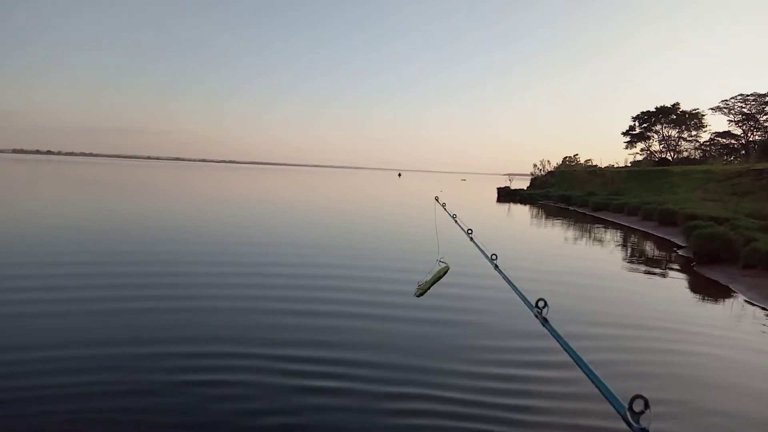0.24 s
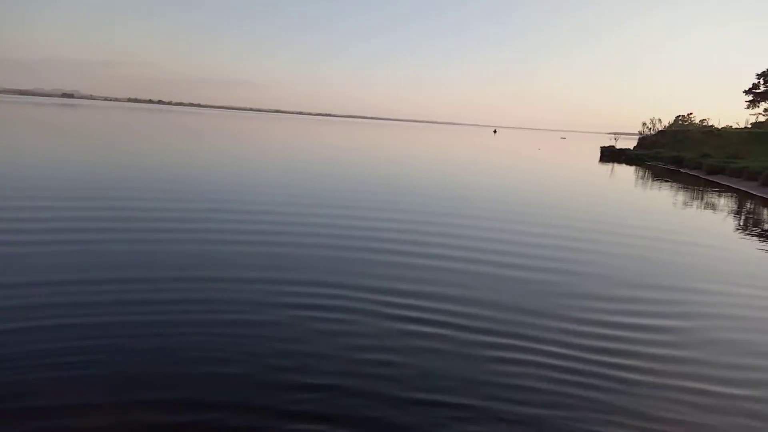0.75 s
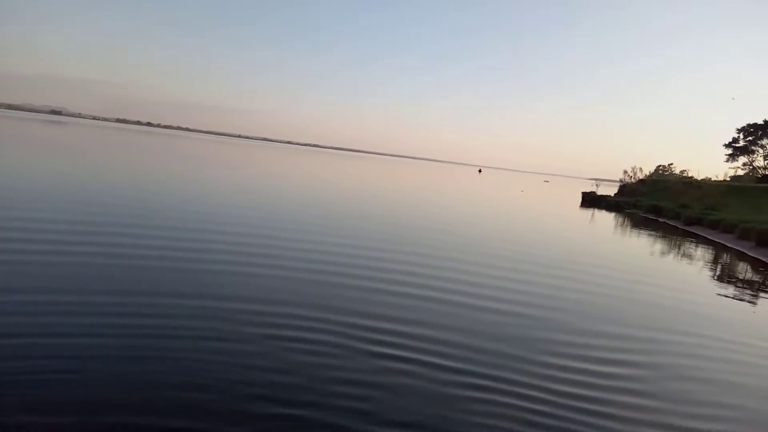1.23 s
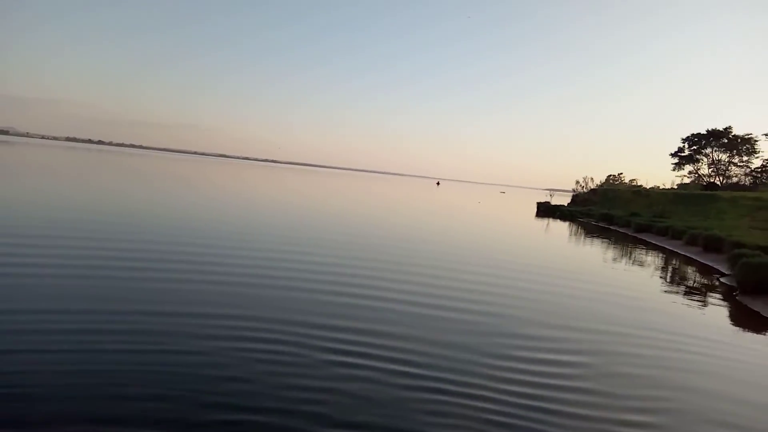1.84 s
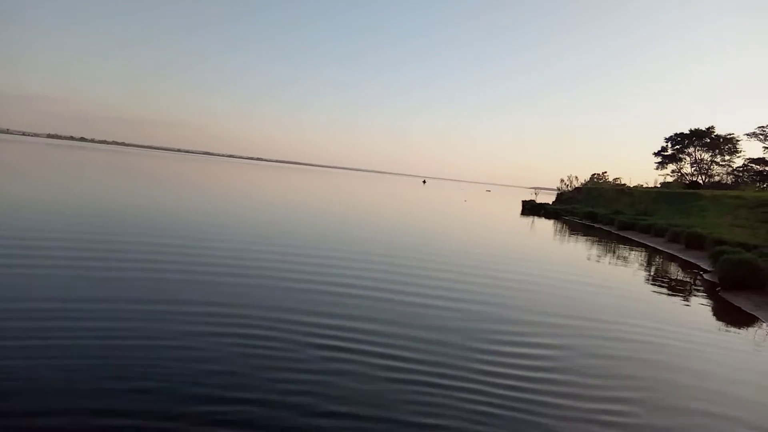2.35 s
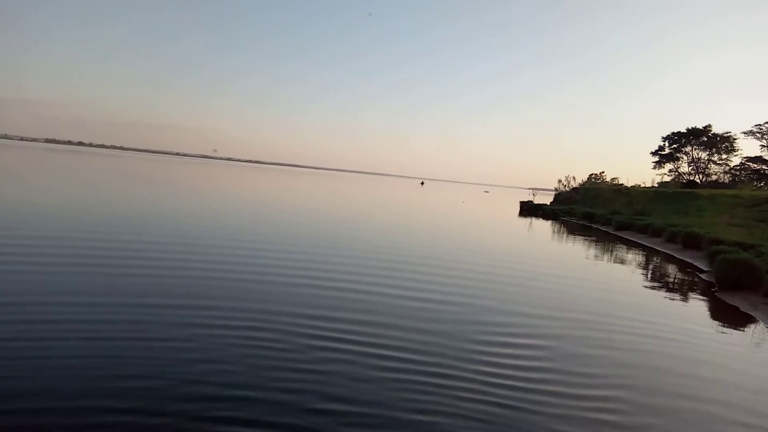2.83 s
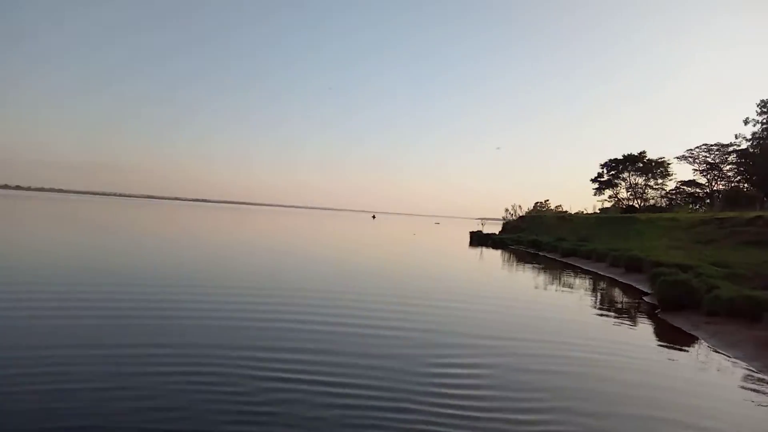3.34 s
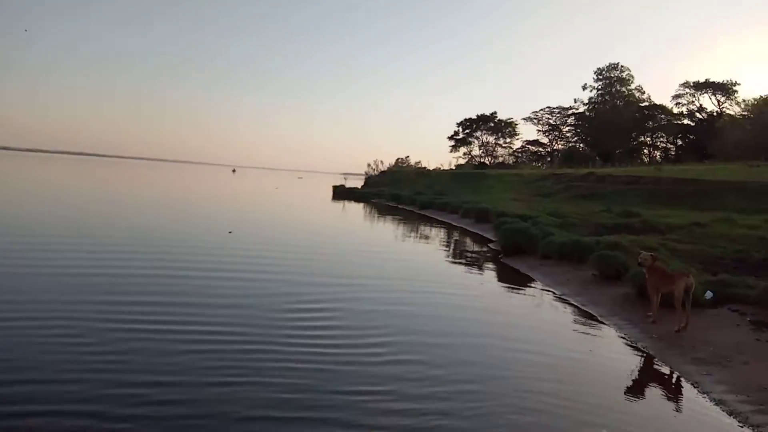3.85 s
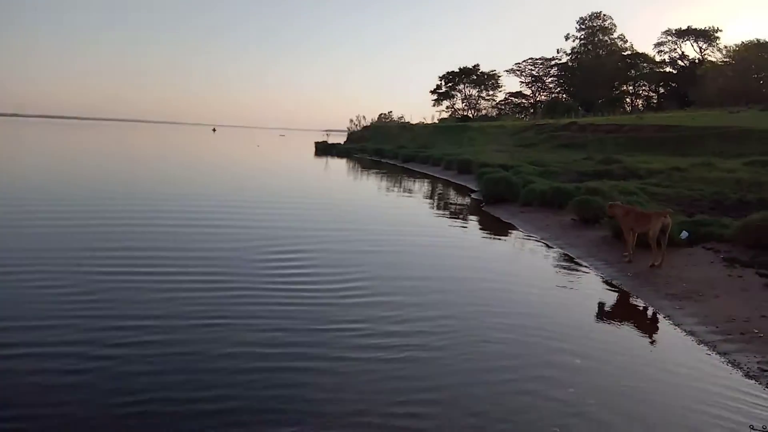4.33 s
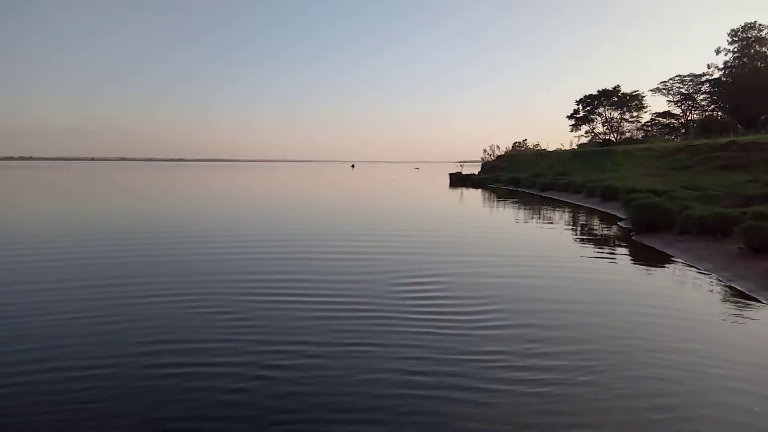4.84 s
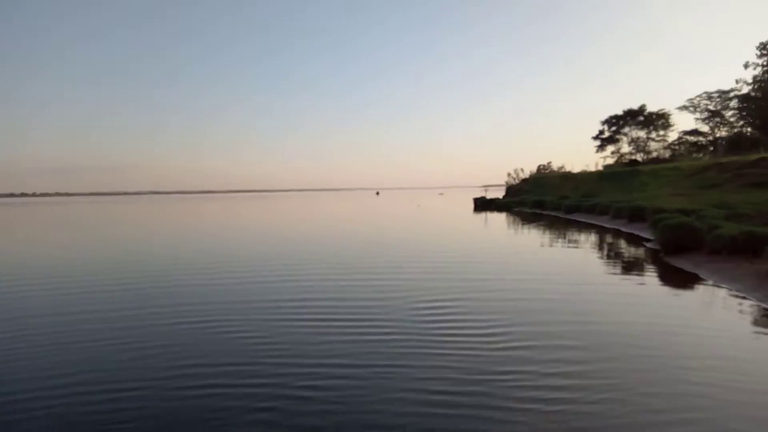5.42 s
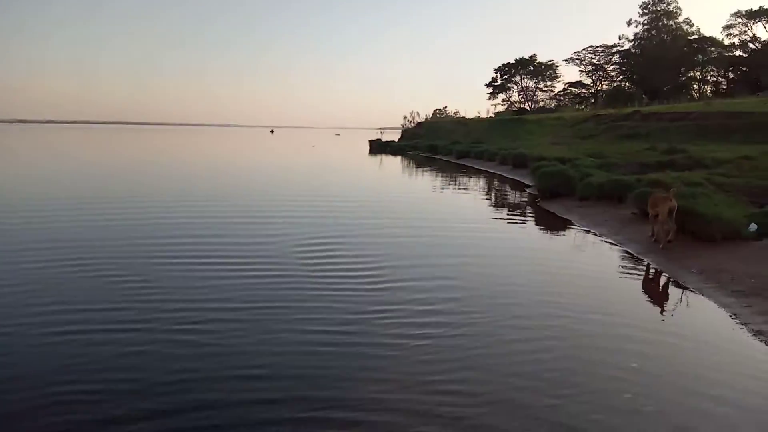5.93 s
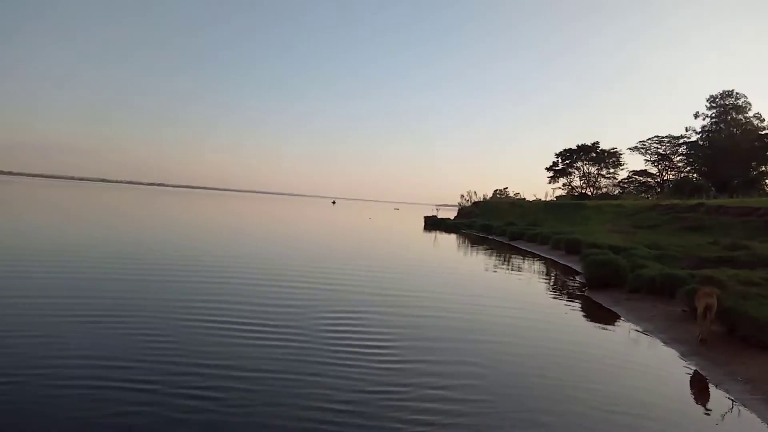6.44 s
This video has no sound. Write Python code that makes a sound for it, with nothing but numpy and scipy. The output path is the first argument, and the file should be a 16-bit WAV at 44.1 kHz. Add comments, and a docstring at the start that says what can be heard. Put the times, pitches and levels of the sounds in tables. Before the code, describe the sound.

A calm open lakeside at dusk, heard from a handheld microphone right beside fishing tackle. Thin, high crickets pulse steadily throughout over a soft low shore murmur and faint hiss. From 0 to 0.5 s, dull low bumps knock the microphone housing. A bright rattle and sharp knock at 0.7 s come with small bubbly water blips until about 1.1 s. From 1.3 to 3.9 s the reel ticks unevenly amid dry clatter and knocks; hard catch snaps sound at 1.6 and 2.6 s, with dense clacks and heavy thumps near 2.4-2.5 s and bright rattling around 3.2 s. After 3.9 s it is much quieter: a hollow sinking plop at 4.2 s, slight tackle rustles and a faint, slowly rising engine hum. From 5.85 s small splashes and gurgling bubbles return with light rattles, and lapping grows to the end at 6.7 s.

```python
"""Fishing tackle rattles and knocks close by on a calm lake shore at dusk, as the angler casts and winds the reel.
It is noise pushed through resonances; the reel's catch snaps over, and dull bumps ring the microphone's housing.
Gliding, decaying tones make the bubbles of small splashes; crickets in the grass are short sinking tones in strokes.
A far engine hums as one low tone, faint chirps come from along the bank, and shaped noise makes the shore murmur."""
import sys
import numpy as np
from scipy import signal
from scipy.io import wavfile
from scipy.ndimage import uniform_filter1d

SR = 44100
rng = np.random.default_rng(int(sys.argv[2]) if len(sys.argv) > 2 else 0)


def dump_mix(stems):
    """Bounce the given channels to the path in sys.argv[1] as a 16-bit WAV at rate SR."""
    frames = np.atleast_2d(stems).T  # one column per channel
    limited = np.clip(frames, -1, 1)  # hard clip at full scale
    pcm = np.round(limited * 32767).astype(np.int16)
    wavfile.write(sys.argv[1], SR, pcm)


N = 294147

# slow course of the evening:
# (time [s], low crickets [dB], high crickets [dB], shore murmur and lapping [dB])
EVENING_COURSE = [(0.0, -60.5, -62, -69), (5.89, -60, -62, -61), (6.67, -64.5, -60.5, -53.5)]
# the reel's catch snaps over: (time [s], relative level [dB])
CATCH_SNAPS = [(1.603, -29), (1.6074, -18.5), (1.62, -24.5), (2.611, -19)]


def undb(db):
    """Logarithmic level: 20 dB is a factor of ten in amplitude."""
    return np.exp(np.asarray(db) * (np.log(10) / 20))


def level(x, db=0):
    """Root mean square: scale a signal to a given effective level."""
    return x * undb(db) / np.sqrt(np.mean(x ** 2))


def curves(table):
    """Linear interpolation: the columns of a table over every sample."""
    s, *columns = np.transpose(table)
    return [np.interp(np.arange(N) / SR, s, c) for c in columns]


def gate(table, fade=0.081):
    """Windowing: 1 from the first to the last time of a table, with linear fades [s] to 0 outside."""
    s = np.arange(N) / SR
    return np.clip(np.minimum(s - table[0][0], table[-1][0] - s) / fade + 1, 0, 1)


def ring(x, modes):
    """Modal superposition: parallel resonances, scaled so that white noise keeps its level."""
    filters = [(undb(db), *signal.iirpeak(hz, hz / width, SR), width) for hz, width, db in modes]
    power = sum(g ** 2 * width for g, b, a, width in filters) * np.pi / SR
    return sum(g * signal.lfilter(b, a, x) for g, b, a, width in filters) / np.sqrt(power)


def walk(rate):
    """Band-limited fluctuation: random values held 1 / rate s and smoothed twice, spread near 1."""
    k = int(SR / rate)
    held = np.repeat(rng.standard_normal(N // k + 1), k)
    return 1.3 * uniform_filter1d(uniform_filter1d(held, k), k)[:N]


def add(out, s, piece):
    """Linear superposition: mix a piece in at a time [s]."""
    i = int(s * SR)
    out[..., i:i + piece.shape[-1]] += piece[..., :N - i]


def decay(t, t60):
    """Exponential damping: amplitude falls by 60 dB in t60 seconds."""
    return np.exp(-np.log(1000) * t / t60)


def bursts(rows, rise_db_per_s, fall_db_per_s):
    """Exponential envelopes: each burst swells up to its start, holds for its length and dies away; powers add."""
    t = np.arange(0, N / SR, .001)[:, None]  # a coarse grid, 1 ms apart
    s, length, db = np.transpose(rows)
    before = np.maximum(s - t, 0)
    after = np.maximum(t - s - length, 0)
    db = db - rise_db_per_s * before - fall_db_per_s * after
    return np.interp(np.arange(N) / SR, t[:, 0], np.sqrt(np.sum(undb(db) ** 2, axis=1)))


def gliding_tone(db, hz, t60, rise, attack_s=0.00077):
    """Damped oscillation: a sine that glides by `rise` octaves while it fades, as a pocket of air rings."""
    t = np.arange(int(t60 * SR)) / SR
    phase = 2 * np.pi * np.cumsum(hz * 2 ** (rise * t / t60)) / SR
    attack = np.minimum(t / max(attack_s, 0.91 / hz), 1)
    return undb(db) * attack * decay(t, t60) * np.sin(phase)


def swarm(count, low_hz, octaves, cycles, scatter_db, small_db, rise):
    """Random superposition: gliding tones of random pitch at random moments, rms 1."""
    out = np.zeros(N)
    for when, small, loud, glide in rng.random((count, 4)):
        hz = low_hz * 2 ** (octaves * small)
        db = small_db * small - scatter_db * np.log(1 - loud)
        add(out, when * N / SR, gliding_tone(db, hz, cycles / hz, rise * (glide - .25)))
    return level(out)


def echo(x, t60, wet_db):
    """Diffuse reflection: scattered echoes off grass and bank as a decaying noise tail."""
    t = np.arange(SR // 4) / SR
    tail = rng.standard_normal(SR // 4) * decay(t, t60)
    return x + undb(wet_db) * signal.fftconvolve(x, tail / np.sqrt(np.sum(tail ** 2)))[:N]


def tackle(per_s=340, pawl_per_s=60, pawl_db=(-4, -2, 8, 4, 7), scatter_db=3.5, colour_db=5, bed_db=-9,
           stir_db=-91, airy_db=-9, crest_db=-9, knock_t60=0.016, grain_s=.0007):
    """Modal excitation: uneven chatter, the reel's ticking pawl and single knocks ring the same modes."""
    # what the tackle rings with, in a dull, a hard, a bright, an airy and a thin group:
    # (frequency [Hz], width [Hz], level [dB])
    tackle_modes = ([(2656, 290, 8.5), (3450, 3560, 6.5)], [(6610, 230, 8.5), (7330, 200, 3.5)],
                    [(8400, 970, 0)], [(10230, 1900, 0)], [(15050, 2800, 15.5)])
    # the tackle is moved about: (start [s], length [s], relative bright level [dB])
    rattle_bursts = [(.43, 0.25, -68), (.55, 0.19, -52.5), (.93, 0.053, -68), (1.06, 0.072, -51.5),
                     (1.43, 0.064, -52), (1.72, 0.056, -53.5), (1.93, 0.034, -54.5), (2.16, 0.069, -61),
                     (2.46, 0.069, -42.5), (2.68, 0.12, -48), (2.97, 0.025, -51.5), (3.14, 0.02, -44),
                     (3.24, 0.22, -47.5), (3.54, 0.0041, -42), (3.64, 0.12, -52), (3.8, 0.052, -64.5),
                     (4.62, 0.0055, -76.5), (4.71, 0.033, -74.5), (4.91, 0.013, -81), (5.06, 0.015, -68.5),
                     (5.85, 0.024, -61), (6.08, 0.08, -58), (6.4, 0.18, -75.5), (6.62, 0.028, -69)]
    # single knocks: (time [s], relative bright level [dB], dull over bright [dB], thin over bright [dB])
    knock_hits = [(0.7056, -16, -10, 6), (0.712, -23.5, 5.5, -4), (0.7327, -33, 15, -8),
                  (0.769, -40, 20, -6), (1.0638, -41, 16.5, -5), (1.291, -27, 6, 0), (1.315, -23.5, -21, 3),
                  (1.352, -28.5, 7, 4), (1.4182, -32.5, 5, -16), (1.573, -29.5, -6, -7),
                  (1.673, -23, -14, -3), (1.698, -25, -25, 5), (1.854, -34.5, -38, 17),
                  (1.888, -31, -6, 10), (1.901, -29.5, -5, 7), (1.975, -28.5, -43, 1),
                  (2.0352, -28, -44, 11), (2.38, -20.5, -0.5, 13), (2.473, -17.5, -11, 11),
                  (2.489, -15.5, -13, 0), (2.647, -25.5, -8.5, -9), (2.773, -22.5, -9, -16),
                  (2.9086, -33, -41, 17), (2.9395, -21, -48, 9), (2.986, -24.5, -50, 9),
                  (3.11, -25, -5.5, -9), (3.2249, -19.5, -43, 16.5), (3.254, -19, -18, 4),
                  (3.31, -25, -19, 15), (3.3785, -16, -14, -8), (3.5191, -34.5, 8.5, 25),
                  (5.0885, -38.5, -17, 5), (6.2519, -40, 14, -7)]
    # where the tackle hangs: (time [s], dull over bright [dB], airy over bright [dB], thin over bright [dB])
    tone_course = [(.4, 2, -15, 4.5), (1.7, -3.5, -29, 2), (1.95, -12, -11, 4), (3.0, -12, -20, 4.5),
                   (3.9, 1, -8, 2), (5.1, -2, 1, -2), (6.67, -4.5, -12, 1)]
    # the reel turns from the first to the last: (time [s],)
    winding_span = [(1.27,), (3.9,)]

    chance = rng.random((2, N))
    struck = chance[0] < per_s / SR * undb(4 * walk(25))
    hits = struck * undb(-scatter_db * np.log(1 - chance[1]))
    teeth = np.cumsum(pawl_per_s * (1 + 0.6 * walk(9.5))) / SR
    ticks = np.diff(np.floor(teeth), prepend=0)
    hits = hits + undb(pawl_db)[:, None] * gate(winding_span) * ticks
    hits = hits * undb(colour_db * rng.standard_normal((len(tackle_modes), N)))  # every scrape favours other modes
    smeared = signal.lfilter([1], [1, -np.exp(-1 / (grain_s * SR))], hits)
    grains = level(smeared) + undb(bed_db)

    # loose parts chatter on for a moment after each knock and snap
    after = [(s, 0.017, db - 28.5) for s, db, *_ in knock_hits + CATCH_SNAPS]
    strength = np.hypot(bursts(rattle_bursts, 458, 302), bursts(after, 1900, 388))
    strength = strength + undb(stir_db + 4.05 * walk(7.3))  # never quite still
    dull_db, airy_tone_db, thin_db = curves(tone_course)
    same_db = 0 * dull_db
    push = strength * grains * undb([dull_db, same_db, same_db, airy_tone_db, thin_db])

    t = np.arange(SR // 10) / SR
    for (s, db, dull_db, thin_db), long in zip(knock_hits, rng.standard_normal(len(knock_hits))):
        fall = np.minimum(t / 0.0013, 1) * decay(t, knock_t60 * 1.55 ** long)
        group_db = np.array([[dull_db], [0], [0], [airy_db], [thin_db]])
        add(push, s, undb(crest_db + db + group_db) * fall)

    scrape = rng.standard_normal(N)
    dull, hard, bright, airy, thin = (ring(p * scrape, modes) for p, modes in zip(push, tackle_modes))
    thin = undb(-9.0) * ring(thin, tackle_modes[-1])  # the topmost resonance has steep flanks
    mix = dull + (hard + bright) / np.sqrt(2) + airy + thin
    return signal.sosfilt(signal.butter(3, 1000, "high", fs=SR, output="sos"), mix)


def snaps(t60=.017):
    """Impact excitation: hard plastic on metal, a sharp noisy push that rings the catch."""
    # (frequency [Hz], width [Hz], level [dB])
    catch_modes = [(4450, 1300, 7), (5400, 2600, 4), (6250, 180, 12), (623, 160, -1.5)]
    push, t = np.zeros(N), np.arange(SR // 10) / SR
    for s, db in CATCH_SNAPS:
        add(push, s, undb(db) * decay(t, t60))
    return undb(-2.5) * ring(push * rng.standard_normal(N), catch_modes)


def bumps(per_s=70, start_push=0.26):
    """Structure-borne sound: irregular random pushes, and a small fixed one at each start, ring the housing."""
    # jolts of the housing: (start [s], length [s], level [dB])
    jolt_bursts = [(0.038, 0.023, -48), (0.159, 0.032, -55), (0.28, 0.0086, -51), (0.359, 0.011, -52),
                   (0.496, 0.013, -55), (1.124, 0.039, -57.5), (1.204, 0.033, -58), (1.68, 0.017, -52.5),
                   (1.878, 0.1, -59), (2.363, 0.088, -49.5), (2.427, 0.11, -43), (2.64, 0.022, -48),
                   (2.961, 0.014, -48.5), (3.207, 0.031, -51), (3.284, 0.082, -48), (3.431, 0.21, -53),
                   (3.853, 0.026, -45.5), (4.472, 0.17, -65)]
    # (frequency [Hz], width [Hz], level [dB])
    housing_modes = [(99.7, 28, 1), (170, 190, -38.5)]
    # sharper blows on the housing: (time [s], peak level [dB], starting frequency [Hz], t60 [s])
    thump_tones = [(1.696, -23.5, 170, 0.034), (2.428, -38, 170, 0.085), (2.486, -32.5, 200, 0.112)]
    pushes = (rng.random(N) < per_s / SR) * rng.standard_normal(N)
    pushes[(np.transpose(jolt_bursts)[0] * SR).astype(int)] = start_push
    soft = signal.sosfilt(signal.butter(3, [45, 230], "band", fs=SR, output="sos"), pushes)
    thud = ring(soft, housing_modes)
    local_rms = np.sqrt(uniform_filter1d(thud ** 2, SR // 12))
    even = thud / (local_rms + 0.37 * thud.std())
    out = bursts(jolt_bursts, 801, 486) * level(even)
    for s, *shape in thump_tones:
        add(out, s, gliding_tone(*shape, rise=-1.0))
    return out


def splashes(lap_db=-6, lap_swell_db=2.2, rise=0.74, sink=-0.175, wash_db=-11, flutter_db=4.5):
    """Bubble resonance: single bubbles rise in pitch near the surface, over a wash, swarms and soft lapping."""
    # single bubbles: (time [s], relative peak level [dB], starting frequency [Hz], t60 [s])
    bubble_tones = [(0.706, -35, 866, 0.052), (0.771, -18, 1860, 0.0088), (0.793, -28, 780, 0.032),
                    (0.83, -44.5, 385, 0.16), (.865, -46.5, 683, 0.11), (.941, -45.5, 666, 0.17),
                    (1.023, -32.5, 2400, 0.019), (1.025, -48, 830, 0.036), (1.064, -39, 1230, 0.029),
                    (1.139, -42, 1010, 0.026), (4.094, -58, 3450, 0.059), (4.108, -44.5, 470, 0.072),
                    (4.381, -38, 1450, 0.015), (5.852, -27, 2380, 0.0086), (5.88, -35.5, 2670, 0.014),
                    (5.908, -45.5, 1190, 0.043), (6.014, -22, 1815, 0.032), (6.029, -43, 753, 0.11),
                    (6.044, -40, 1010, 0.038), (6.085, -34, 1050, 0.034), (6.103, -32.5, 382, 0.14),
                    (6.145, -34.5, 2730, 0.022), (6.250, -40, 940, 0.017), (6.269, -25, 2655, 0.0038),
                    (6.361, -43.5, 1800, 0.023), (6.584, -38, 1900, 0.023), (6.602, -32.5, 450, 0.033)]
    # one hollow plop whose tones sink: (time [s], relative peak level [dB], starting frequency [Hz], t60 [s])
    plop_tones = [(4.192, -33.5, 506, 0.061), (4.196, -35.5, 1545, 0.031), (4.196, -37.5, 444.5, 0.28)]
    # swirls of small bubbles: (start [s], length [s], relative level [dB])
    gurgle_bursts = [(.716, 0.075, -48.5), (1.03, 0.068, -54.5), (4.1, 0.24, -68.5), (5.94, 0.13, -48.5),
                     (6.07, 0.043, -46.5), (6.25, 0.01, -55), (6.34, 0.19, -65), (6.59, 0.093, -49.5)]
    lapping = swarm(count=900, low_hz=489.0, octaves=1.111, cycles=90, scatter_db=3.5, small_db=-3, rise=1.0)
    murmur_db = curves(EVENING_COURSE)[2]
    out = undb(murmur_db + lap_db + lap_swell_db * walk(2.674)) * lapping

    fizz = swarm(count=2800, low_hz=700.0, octaves=2.5, cycles=26, scatter_db=2.8, small_db=9, rise=0.98)
    wash = undb(wash_db) * ring(rng.standard_normal(N), [(1530, 2400, 0)])
    out += bursts(gurgle_bursts, 802, 148) * (fizz + wash)

    single = np.zeros(N)
    for s, *shape in bubble_tones:
        add(single, s, gliding_tone(*shape, rise))
    for s, *shape in plop_tones:
        add(single, s, gliding_tone(*shape, sink))
    out += single * undb(1 - flutter_db * np.abs(walk(110)))  # the churned surface makes them flutter
    return echo(out, 0.057, -6.5)


def crickets(unsteady_db=3.5, fading_db=2.0, slip=1.28, detune=.008, octave_db=-11):
    """Stridulation: each wing stroke is a short tone that sinks in pitch, none quite alike; the grass smears them."""
    # one row per choir: (wing tone [Hz], spread of pitch [Hz], strokes per second [1/s],
    # spread of stroke rate [0-1], stroke share of the period [0-1], level relative to the evening's [dB])
    cricket_kinds = [(4320, 10.2, 41, 0.01, 0.62, -7.5), (4740, 11, 12.8, 0.01, 0.4, -9.5),
                     (4510, 125, 48, 0.4, 0.9, -6.5), (5834, 270, 68, 0.4, .7, 3),
                     (6640, 130, 39, 0.08, 0.6, -8)]
    # for each choir in turn: (singers [count])
    singer_counts = (1, 1, 11, 16, 4)
    low_db, high_db, _ = curves(EVENING_COURSE)
    t, out, drift = np.arange(N) / SR, 0, walk(1.54)
    for (hz, spread_hz, rate, loose, share, db), count in zip(cricket_kinds, singer_counts):
        choir = 0
        alone = count == 1  # the two nearest are steadier and have an overtone
        rank = (np.arange(count) + rng.random(count)) / count
        pitches = np.log(rank / (1 - rank)) / 1.7  # they fill the range, densest in its middle
        for pitch, (pace, size) in zip(pitches, rng.standard_normal((count, 2))):
            own = np.roll(drift, rng.integers(N))
            beat = rate * (1 + loose * pace) * t + rng.random() * (not alone) + 0.08 * own + 1
            stroke = np.clip(beat % 1 / share, 0, 1)
            per_stroke = rng.standard_normal((3, 1000))[:, beat.astype(int)]
            force, tune, jump = per_stroke * (.4 if alone else 1)
            wing_hz = hz + spread_hz * np.clip(pitch, -2, 2)
            phase = 2 * np.pi * np.cumsum(wing_hz * (1.008 - .016 * stroke + detune * tune)) / SR
            tone = np.sin(((phase + slip * jump) % (2 * np.pi)).astype(np.float32))
            envelope = np.sin(np.pi * stroke.astype(np.float32))
            swing = undb(0.12 * size + unsteady_db * force + fading_db * own) * envelope
            overtone = alone * undb(octave_db + fading_db * own) * 2 * tone ** 2  # squaring gives the octave
            choir = choir + swing * (tone + overtone)
        out = out + level(choir, db) * undb(low_db if hz < 5000 else high_db)
    out = signal.sosfilt(signal.butter(2, 3000, "high", fs=SR, output="sos"), out)
    return echo(out, 0.35, -8.5)


def engine():
    """Periodic source: a distant engine reaches the shore as one wavering low tone."""
    # (time [s], frequency [Hz], level [dB])
    engine_course = [(3.95, 53.4, -78), (4.9, 58.2, -66), (5.4, 59.6, -68), (5.6, 63.1, -78),
                     (6.15, 66.4, -65.5), (6.67, 68.7, -73)]
    hz, db = curves(engine_course)
    tone = np.sqrt(2) * np.sin(2 * np.pi * np.cumsum(hz) / SR)
    return gate(engine_course, 0.16) * undb(db + 0.15 * walk(14)) * tone


def chirps(db=-91):
    """Reverberant field: faint drawn-out chirps from far along the bank, their echoes above the direct sound."""
    calls = swarm(count=110, low_hz=1900, octaves=.9, cycles=260, scatter_db=4.0, small_db=-8, rise=0.071)
    return undb(db) * echo(calls, .3, 3)


def air(murmur_level_db=-68, hiss_db=-91.5, gust_depth_db=3.5):
    """Band-filtered noise: a shore murmur of flickering bands, the middle swelling with the ripples, and faint hiss."""
    # spectrum of the murmur: (frequency [Hz], relative density [dB per Hz])
    air_spectrum = [(25, -36), (54, 2), (205, -7), (286, -17), (418, -14.5), (637, -6), (949, -28.5),
                    (1410, -21.5), (3800, -33.5), (4940, -89)]
    swell_db = curves(EVENING_COURSE)[2]
    swell_db = swell_db - swell_db.mean()
    gust_db = gust_depth_db * walk(3.686)  # light air stirs the bass
    hz, db = np.transpose(air_spectrum)
    out = 0
    for centre in 30 * 2 ** np.arange(0, 7.1, 1 / 3):  # third octaves
        here_db = np.interp(np.log(centre), np.log(hz), db) + 10 * np.log10(centre)
        mode = [(centre, centre / 3, 0)]
        band = ring(ring(rng.standard_normal(N), mode), mode)
        middle, bass = 250 < centre < 1500, centre < 250
        out = out + level(band, here_db) * undb(swell_db * middle + gust_db * bass + 1.06 * walk(3.8))
    hiss = ring(rng.standard_normal(N), [(9450, 5800, 2.5), (16000, 2600, 3.2)])
    return level(out, murmur_level_db) + level(hiss, hiss_db) * undb(0.91 * walk(7.7))


def scene():
    """Superposition: all sources add at one microphone."""
    close = tackle() + snaps() + bumps() + splashes()
    far = crickets() + engine() + chirps() + air()
    return (close + far)[None]


def record(dry, edge_hz=15850, top_hz=17100):
    """Low-pass response: a steep drop above the microphone's top resonance, then the final cut-off."""
    edge = signal.sosfilt(signal.ellip(8, .2, 70, edge_hz, fs=SR, output="sos"), dry)
    edge = edge + undb(-26) * dry  # a little passes above the drop
    return signal.sosfilt(signal.ellip(8, .2, 70, top_hz, fs=SR, output="sos"), edge)


dry = scene()
out = record(dry)
dump_mix(out)
```